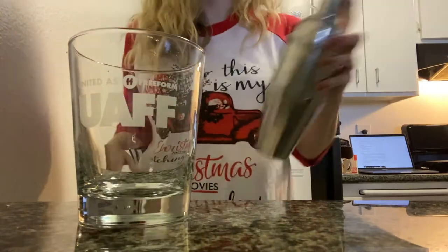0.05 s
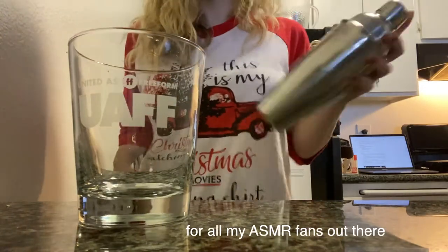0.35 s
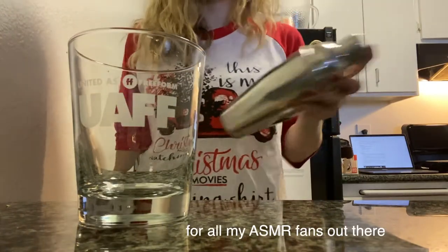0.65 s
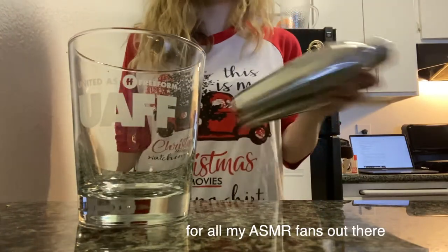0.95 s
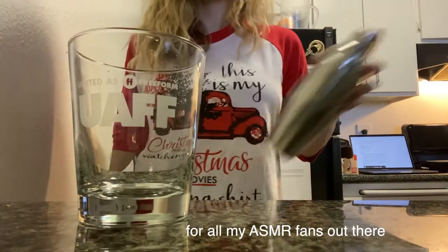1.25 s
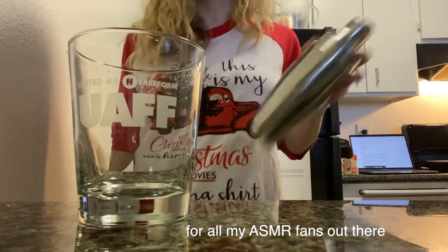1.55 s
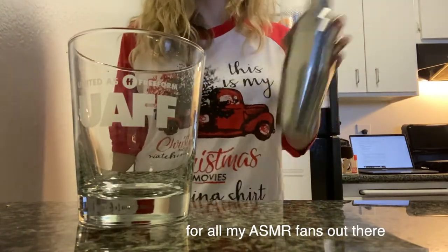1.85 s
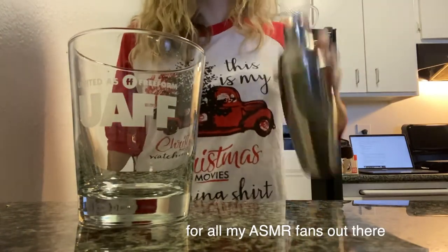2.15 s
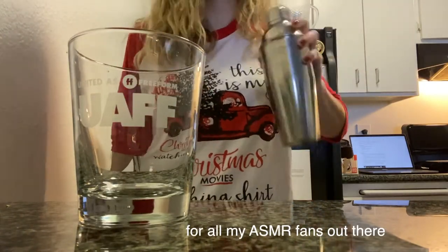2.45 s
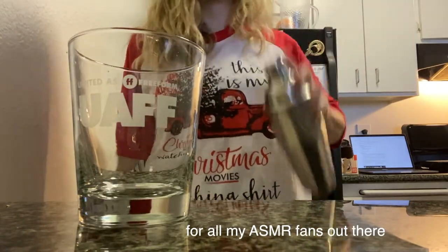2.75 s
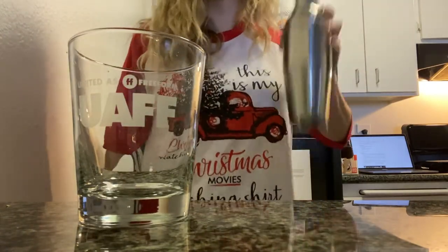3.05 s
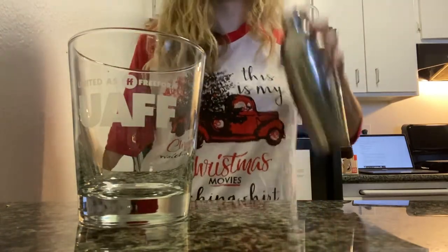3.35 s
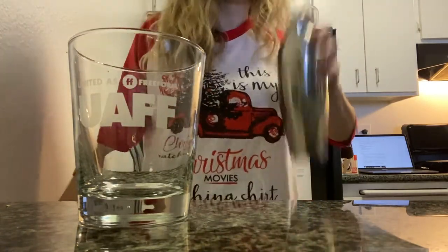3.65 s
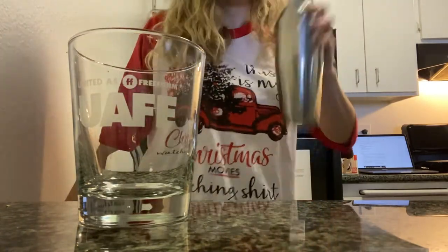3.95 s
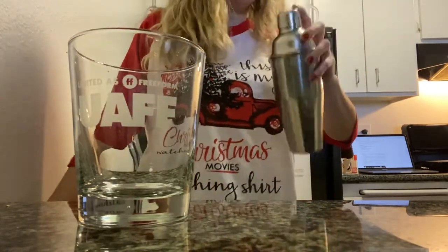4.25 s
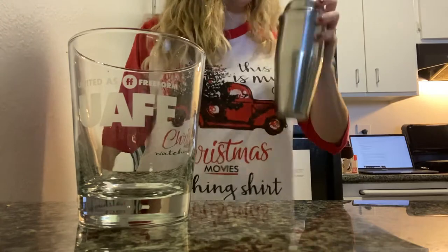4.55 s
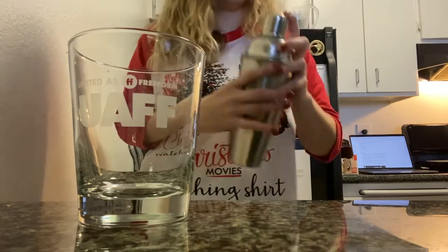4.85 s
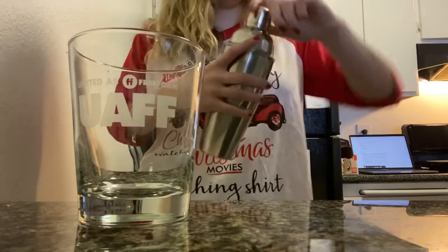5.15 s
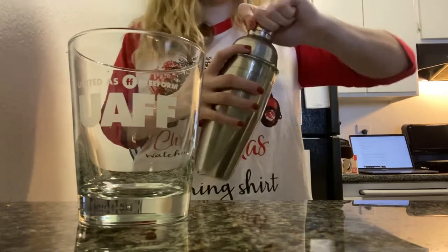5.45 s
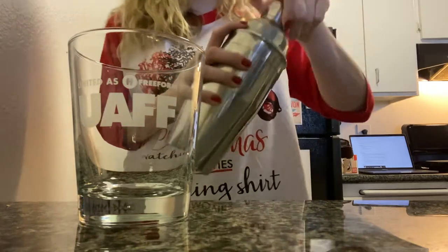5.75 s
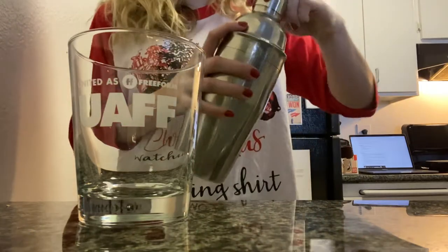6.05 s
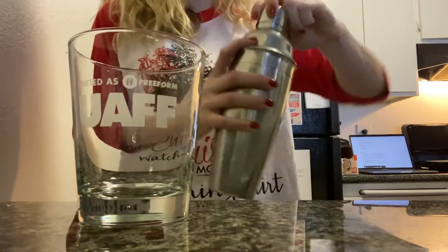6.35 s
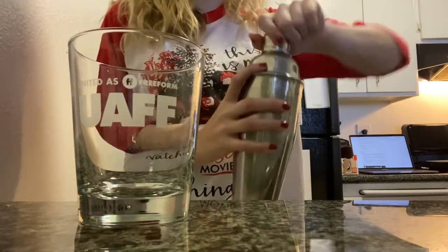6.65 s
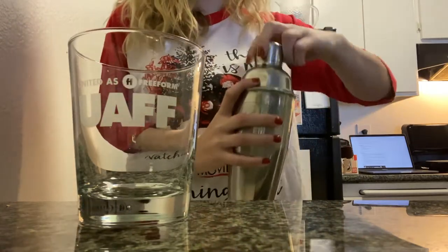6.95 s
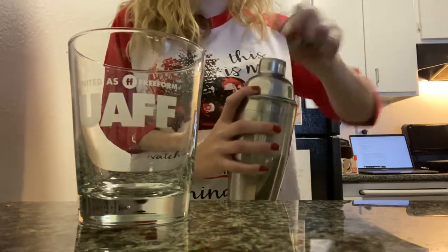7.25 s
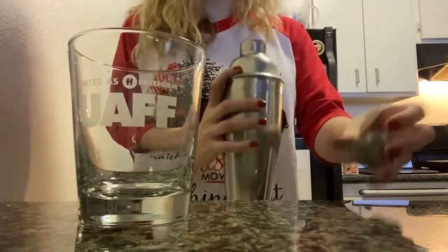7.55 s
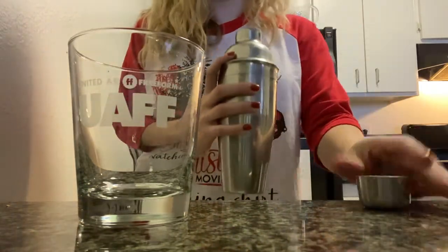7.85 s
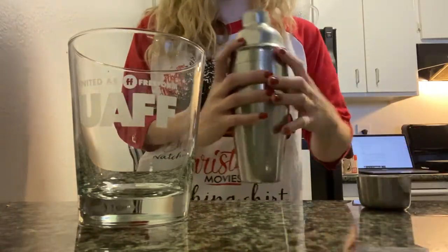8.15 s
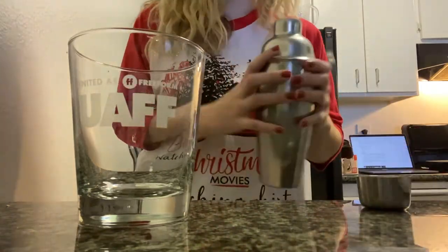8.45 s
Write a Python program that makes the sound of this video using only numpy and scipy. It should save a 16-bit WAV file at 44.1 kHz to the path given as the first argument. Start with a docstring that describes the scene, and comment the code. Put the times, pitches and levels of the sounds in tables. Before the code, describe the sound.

A metal cocktail shaker is shaken with clattering ice and sloshing drink, followed by quiet twisting and one sharp, ringing clink.

```python
"""Shaking a cocktail

Ice and drink are shaken hard in a steel shaker: cubes strike, chips tumble and the liquid gurgles.
Then fingers tap the shaker and twist its tight cap, a small steel cup chimes on the stone counter,
and a hand grips the shaker again. An appliance hums, the kitchen echoes, and a limiter (an automatic
volume control) briefly turns the sound down after the cup lands."""
import sys
import numpy as np
from scipy import signal
from scipy.fft import rfft, irfft, next_fast_len
from scipy.io import wavfile
from scipy.ndimage import uniform_filter1d, map_coordinates

SR = 44100
rng = np.random.default_rng(int(sys.argv[2]) if len(sys.argv) > 2 else 0)


def store_pcm(level_fs):
    """Save levels as 16-bit WAV."""
    pcm = np.round(np.clip(level_fs, -1, 1) * 32767).astype(np.int16)
    wavfile.write(sys.argv[1], SR, np.atleast_2d(pcm).T)


N = 378819

# the tone of moving liquid: pitch_hz, level_db
LIQUID_TONE = [(300, -16), (650, -0.5), (900, -10.5), (1250, 3.5), (1650, -7), (2800, -4.5), (6500, -20),
               (16000, -28)]
# the drink lands at one end of the shaker and traps a pocket of air: start_s, level_db
SPLASH_TIMES = [(.255, -33.5), (.99, -34.5), (1.38, -26.5), (1.635, -33.5), (1.73, -29), (1.99, -30),
                (2.134, -24), (2.332, -33.5), (3.478, -31.5), (3.677, -25), (3.869, -27), (4.189, -30),
                (4.711, -31.5)]
# the tone of rubbing on steel: pitch_hz, level_db
RUB_TONE = [(250, -0.5), (1600, 0.5), (4000, -11), (16000, -6)]


def amp(db):
    """Turn decibels into a gain. amp(-60 * t / fade_s) dies away by 60 dB in fade_s seconds."""
    return 10 ** (np.asarray(db) / 20)


def unit(x):
    """Scale a sound to an average strength (rms) of 1."""
    return x / np.sqrt(np.mean(x ** 2) + 1e-20)


def burst(x):
    """Scale a short sound to the energy of 4 ms at strength 1."""
    return x * np.sqrt(.004 * SR / (np.sum(x ** 2) + 1e-20))


def along(points, hz):
    """Read between the rows of a (pitch_hz, value) table, with octaves evenly spaced."""
    pitches, values = np.transpose(points)
    return np.interp(np.log(hz + 1), np.log(pitches + 1), values)


def wobble(rate):
    """A smooth curve through `rate` random values a second."""
    return map_coordinates(rng.standard_normal(int(N * rate / SR) + 4), [np.arange(N) * rate / SR])


def filtered(x, response):
    """Change the strength and timing of each frequency in a sound by response(hz)."""
    n = x.shape[-1]
    padded = next_fast_len(n + min(n, 8192))
    return irfft(rfft(x, padded) * response(np.fft.rfftfreq(padded, 1 / SR)), padded)[..., :n]


def coloured(x, tone):
    """Shape a sound with a (pitch_hz, level_db) table and scale it to strength 1."""
    return unit(filtered(x, lambda hz: amp(along(tone, hz))))


def resonate(x, resonances, shift=1):
    """Make a sound ring at a body's own pitches, each multiplied by shift."""
    def response(hz):
        return sum((-1) ** k * amp(db) * 1j * hz * width
                   / ((pitch * shift) ** 2 - hz * hz + 1j * hz * width)
                   for k, (pitch, width, db) in enumerate(resonances))
    return filtered(x, response)


def grainy(tone, grain_db, rate, apart):
    """Stereo noise in uneven grains; a larger `apart` makes left and right less alike."""
    noise = rng.standard_normal((3, N))
    return coloured((noise[0] + apart * noise[1:]) * amp(grain_db * wobble(rate)), tone)


def add(track, start_s, sound):
    """Mix a sound into a track at start_s."""
    part = track[..., max(round(start_s * SR), 0):][..., :sound.shape[-1]]
    part += sound[..., :part.shape[-1]]


def placed(x, lag_ms, left_db):
    """Make a sound stereo: the left microphone hears it lag_ms later and left_db louder."""
    side = np.array([[1], [-1]])
    return filtered(x, lambda hz: amp(side * left_db / 2) * np.exp(-1j * np.pi * side * hz * lag_ms / 1000))


def background(hum_db=-50, drone_db=-60, rumble_db=-52):
    """An appliance hums on two low notes over the steady rumble of the room."""
    # the tone of the room's rumble: pitch_hz, level_db
    rumble_tone = [(25, -33.5), (60, -6.5), (145, -1.5), (210, -29.5), (400, -22), (800, -39), (4000, -57)]
    t = np.arange(N) / SR
    hum = amp(hum_db + wobble(6)) * np.sin(2 * np.pi * 59.3 * t + .5 * wobble(7))
    drone = amp(drone_db + 2 * wobble(8)) * np.sin(2 * np.pi * 130 * t + wobble(20))
    rumble = amp(rumble_db) * grainy(rumble_tone, grain_db=1.5, rate=9, apart=.35)
    return (np.sqrt(2) * (hum + drone) + rumble) * amp([[.9], [-.9]])


def slosh(burble_db=-9, burble_hz=950):
    """Liquid and foam wash along the walls, burbling as air pockets open, glide in pitch and close."""
    # how the wash of thrown liquid rises and falls: time_s, relative_level_db
    wash_levels = [(0, -36), (.8, -41.5), (2.3, -36.5), (4.1, -40.5), (4.72, -45), (4.9, -62)]
    loudness = amp(np.interp(np.arange(N) / SR, *np.transpose(wash_levels), left=-120, right=-120))
    wash = grainy(LIQUID_TONE, grain_db=3.5, rate=90, apart=.9)
    hz = burble_hz * np.exp(.3 * wobble(45))
    burble = unit(amp(7 * wobble(110)) * np.sin(2 * np.pi * np.cumsum(hz) / SR))
    return amp(-2.5) * loudness * (wash + amp(burble_db) * burble)


def strike(hz, db, wall_db=3, crack_db=-4, pocket_db=-18, crack_fade_s=.003, crush_fade_s=.0083):
    """One blow: a short ping, the crack of ice, and the ring of the steel wall and the air inside."""
    # the ringing pitches of the filled shaker: pitch_hz, width_hz, level_db
    wall_resonances = [(1103, 160, -2), (1349, 104, 1.5), (1813, 52, -1.5), (2141, 200, -3.5),
                       (2788, 330, -3), (3723, 1240, -7.5), (9150, 13000, -16.5)]
    # the ringing pitches of the air pocket above the drink: pitch_hz, width_hz, level_db
    pocket_resonances = [(370, 7.5, -10), (665, 15, -1)]
    t = np.arange(SR // 16) / SR
    noise = rng.standard_normal((3, len(t)))
    ping = burst(np.sin(2 * np.pi * hz * t) * np.exp(-t * hz) * (1 - np.exp(-t * hz * 2)))
    # hard, bright blows crack most; dull, heavy ones stir the air pocket
    brightness = hz / 2500
    snap = np.diff(noise[0], prepend=0) * amp(-60 * t / crack_fade_s)
    crack = burst(snap) * brightness * amp(.2 * (db + 22))
    crush = noise[1:] * amp(-60 * t / crush_fade_s)
    # the moving liquid weighs on the walls differently at every blow, shifting their pitches
    shift = np.exp(rng.normal(0, .058, 2))
    wall = resonate(crush[0], wall_resonances, shift[0])
    # pitches near that of the blow ring most
    wall = burst(filtered(wall, lambda f: 1 / (1 + .64j * (f / hz - hz / (f + 1)))))
    pocket = burst(resonate(crush[1], pocket_resonances, shift[1])) / brightness
    return amp(db) * burst(ping + amp(crack_db) * crack + amp(wall_db) * wall + amp(pocket_db) * pocket)


def knocks(rows, lag_ms):
    """Play (start_s, level_db, pitch_hz) blows, each from a slightly different place."""
    out = np.zeros((2, N))
    for start_s, db, hz in rows:
        blow = strike(hz, db)
        add(out, start_s, placed(blow, lag_ms + rng.normal(0, .064), left_db=rng.normal(1.57, 1)))
    return out


def ice(cube_hz=2550, wet_drop=.26, wet_s=.029, crunch_db=-9, crunch_delay_s=.0016):
    """Cubes strike the shaker and crunch against a second edge; chips tumble after them."""
    # a cube hits the wall or another cube: start_s, level_db
    cube_hits = [(0.03, -20), (.052, -25), (0.083, -22.5), (0.2272, -18.5), (0.2609, -20), (.367, -25),
                 (.392, -22), (.4038, -21.5), (.489, -24.5), (0.5409, -16), (0.5469, -19), (0.6033, -21),
                 (0.646, -31.5), (.6853, -23.5), (.6982, -18), (.831, -14), (.849, -23.5), (.8789, -24.5),
                 (.9953, -18.5), (1.0614, -22), (1.0821, -21), (1.2116, -22), (1.3378, -9.5), (1.391, -20),
                 (1.4405, -22.5), (1.4746, -12.5), (1.497, -21), (1.556, -26.5), (1.5726, -16),
                 (1.6582, -23), (1.6938, -29), (1.719, -16), (1.7408, -25.5), (1.7722, -22.5),
                 (1.8114, -17.5), (1.8701, -21), (2.0236, -24.5), (2.0355, -22), (2.0514, -23),
                 (2.1158, -22), (2.1403, -18), (2.182, -24.5), (2.1961, -24.5), (2.2496, -17.5),
                 (2.3113, -18), (2.3364, -14.5), (2.343, -18.5), (2.3932, -27), (2.4391, -16.5),
                 (2.5128, -20), (2.5277, -15.5), (2.5821, -25), (2.5916, -21.5), (2.6004, -24),
                 (2.6382, -20), (2.7613, -22), (2.814, -26), (2.9318, -26.5), (2.9797, -25.5),
                 (3.0966, -22.5), (3.1092, -24.5), (3.1227, -20.5), (3.129, -21), (3.1726, -26.5),
                 (3.245, -23), (3.2538, -24), (3.3049, -20.5), (3.3296, -16), (3.3467, -21.5), (3.369, -16),
                 (3.387, -23.5), (3.395, -23.5), (3.464, -21.5), (3.4835, -17.5), (3.5403, -22.5),
                 (3.6761, -22), (3.6979, -19), (3.707, -25), (3.7597, -24.5), (3.8708, -12.5),
                 (3.8803, -25), (3.9264, -26), (4.0025, -26.5), (4.1056, -32), (4.1897, -15),
                 (4.2986, -26.5), (4.3262, -22), (4.334, -16), (4.3483, -15), (4.4104, -19.5),
                 (4.4515, -16.5), (4.4646, -20), (4.6325, -28.5), (4.6693, -19), (4.7132, -23)]
    start_s, db = np.transpose(cube_hits)
    wait, tone = rng.standard_normal((len(start_s), 2)).T
    # a cube that lands close in time to a splash is cushioned, so its pitch is lower
    wetness = np.max([np.exp(-((start_s - splash_s) / wet_s) ** 2) for splash_s, _ in SPLASH_TIMES], 0)
    hz = cube_hz * np.exp(.19 * tone) * (1 - wet_drop * wetness)
    crunches = zip(start_s + crunch_delay_s * np.exp(.5 * wait), db + crunch_db, hz)
    return knocks([*zip(start_s, db, hz), *crunches, *tumble(start_s)], lag_ms=-.011)


def after_ring(blows, ring_db=-18, waver=.32):
    """The steel wall rings on faintly after each blow; the moving drink makes it waver."""
    # the lingering notes of the wall: pitch_hz, level_db, fade_s
    wall_notes = [(1330, -12.5, 0.83), (1800, -5.5, 0.5), (2290, 2, 0.25), (2870, -7, .85),
                  (5270, -12, 0.76), (9650, -12, .5)]
    t = np.arange(SR) / SR
    ring = sum(amp(db - 60 * t / fade_s) * np.sin(2 * np.pi * hz * t + waver * wobble(70)[:SR])
               for hz, db, fade_s in wall_notes)
    return amp(ring_db) * blows.std() * unit(signal.fftconvolve(blows, ring[None], axes=1)[:, :N])


def tumble(cube_times, chip_db=-33, chip_hz=3300, delay_s=.04):
    """Two chips of random size tick after each cube. Gives rows of start_s, level_db, pitch_hz."""
    cube_s = np.repeat(cube_times, 2)
    wait, size, tone = rng.standard_normal((len(cube_s), 3)).T
    start_s = cube_s + delay_s * np.exp(.7 * wait)
    return zip(start_s, chip_db + 1.5 * size, chip_hz * np.exp(.36 * tone))


def grips(rustle_db=-16):
    """A soft palm thuds on the shaker and rustles along it."""
    # a hand closes and slides: start_s, length_s, level_db
    hand_moves = [(0.158, 0.11, -39.5), (5.322, 0.045, -49), (5.35, 2.1, -61.5), (8.181, 0.53, -51)]
    pressure = np.zeros(N)
    for start_s, length_s, db in hand_moves:
        add(pressure, start_s, amp(db) * np.sqrt(np.linspace(1, 0, int(length_s * SR))))
    rustle = grainy(RUB_TONE, grain_db=6, rate=110, apart=.98)
    thud = unit(resonate(rustle, [(193, 125, -.09), (346.5, 64, -.91)]))  # pitch_hz, width_hz, level_db
    return pressure * (thud + amp(rustle_db) * rustle)


def splashes(glug_hz=760, sink_hz_per_s=38, glug_db=1, bubble_db=-4, wash_db=-6, rise_s=.0095):
    """Each splash swells and drains while its air pocket and a smaller bubble ring unsteadily."""
    swell, glugs = np.zeros(N), np.zeros((2, N))
    t = np.arange(SR // 8) / SR
    for start_s, db in SPLASH_TIMES:
        hz = glug_hz - sink_hz_per_s * start_s  # the pitch sinks as the drink froths up
        surge = amp(db) * t / rise_s * np.exp(1 - t / rise_s)
        pocket = np.sin(2 * np.pi * hz * t + wobble(200)[:len(t)])
        bubble = amp(bubble_db) * np.sin(2 * np.pi * 1.7 * hz * t + wobble(200)[:len(t)])
        add(swell, start_s, surge)
        add(glugs, start_s, placed(surge * (pocket + bubble), lag_ms=rng.normal(0, .37), left_db=-1))
    wash = swell * grainy(LIQUID_TONE, grain_db=4.5, rate=270, apart=.31)
    return amp(glug_db) * glugs + amp(wash_db) * wash


def taps():
    """The ice settles, and fingers knock lightly on the shaker as they handle it."""
    # small knocks: start_s, relative_level_db, pitch_hz
    small_knocks = [(4.792, -23, 1436), (4.916, -35, 2900), (5.025, -36, 1494), (5.108, -42, 1350),
                    (5.379, -27, 2815), (5.562, -33.5, 3540), (5.754, -39, 1246), (6.252, -43.5, 3050),
                    (6.652, -39.5, 4150), (6.684, -27, 1370), (6.791, -45.5, 2820), (8.172, -41.5, 3540),
                    (8.359, -41, 3500)]
    return amp(-8) * knocks(small_knocks, lag_ms=-.059)


def scrapes(grit_db=-3, cap_db=-5, edge_db=-1, squeal_db=-10, squeal_hz=2100):
    """The tight cap sticks and slips on the steel, ringing a little under unsteady fingers."""
    # short twists of the cap: start_s, length_s, level_db
    twists = [(5.32, 0.029, -44.5), (5.382, .25, -52), (5.521, .025, -49), (5.68, .018, -48),
              (5.885, 0.098, -49.5), (5.926, .02, -49), (6.021, .02, -49.5), (6.33, 0.047, -47.5),
              (6.427, 0.24, -56), (6.521, 0.038, -52), (6.861, 0.024, -46.5), (6.889, 0.082, -51),
              (6.991, .06, -45.5), (7.029, .016, -41), (7.05, 0.017, -34.5)]
    # the ringing pitches of the small steel cap: pitch_hz, width_hz, level_db
    cap_resonances = [(2280, 700, 8), (9910, 370, -14)]
    # the ringing pitch of the cap's edge: pitch_hz, width_hz, level_db
    edge_resonance = [(3463, 360, 0)]
    strokes = np.zeros(N)
    for start_s, length_s, db in twists:
        add(strokes, start_s, amp(db) * np.sqrt(np.hanning(int(length_s * SR))))
    grit = grainy(RUB_TONE, grain_db=3, rate=900, apart=.6)
    cap = amp(cap_db) * unit(resonate(grit, cap_resonances))
    # the point of contact wanders, and its rasping pitch with it
    hz = squeal_hz * np.exp(.25 * wobble(160))
    squeal = amp(squeal_db) * unit(amp(6 * wobble(300)) * np.sin(2 * np.pi * np.cumsum(hz) / SR))
    # the harder the stroke, the more the edge rings
    edge = amp(edge_db) * strokes / strokes.max() * unit(resonate(grit, edge_resonance))
    pressure = amp(1.2 * wobble(70))
    return strokes * pressure * (amp(grit_db) * grit + cap + edge + squeal)


def cup(clack_db=7, free_ring_db=-29, contact_fade_s=.044, clack_fade_s=.046):
    """A steel cup lands on stone: a clack, a chime cut short by the contact, and a faint free ring."""
    # the rim touches, lands and rocks: start_s, level_db, hardness (0 to 1)
    landings = [(7.595, -17, 0.03), (7.604, -9.5, 0.02), (7.6089, -5.5, 0.21), (7.6127, -12, 0.48)]
    # the notes of the cup: pitch_hz, level_db, free_fade_s
    cup_notes = [(2570, -15, .3), (2710, -16, .3), (5160, -12, .35), (5295, -9, .45), (5400, 0, .4),
                 (9720, -8, .42)]
    # the tone of steel hitting stone: pitch_hz, level_db
    clack_tone = [(200, -18), (650, -12), (850, -21), (1700, -16), (2600, 1), (3700, -10), (5300, -3),
                  (8300, -32), (9300, -14), (11500, -44), (15600, -19)]
    clacks, swell = np.zeros(N), np.zeros((len(cup_notes), N))
    t = np.arange(SR * 3 // 4) / SR
    hz, note_db, free_fade_s = np.transpose(cup_notes)[..., None]
    fade = amp(note_db) * (amp(-60 * t / contact_fade_s) + amp(free_ring_db - 60 * t / free_fade_s))
    for start_s, db, hardness in landings:
        # a soft touch builds the chime slowly and wakes little but its strongest note
        rise = 1 - np.exp(-t * hardness / .00015)
        add(swell, start_s, amp(db + note_db * (1 - hardness)) * fade * rise)
        clack = coloured(rng.standard_normal(len(t)), clack_tone)
        add(clacks, start_s, hardness * clack * amp(db + clack_db - 60 * t / clack_fade_s))
    waver = .9 * wobble(150)  # the chime wavers and sounds rough as it rings in the room
    chime = np.sum(swell * np.sin(2 * np.pi * hz * np.arange(N) / SR + waver), axis=0)
    return placed(chime + clacks, lag_ms=-.0093, left_db=-3.5)


def kitchen(x, near_db=2, near_fade_s=.07):
    """The counter and cupboards give a short echo, and the room a longer one."""
    # how long the room's echo lasts: pitch_hz, fade_s
    room_fades = [(200, 0.34), (1100, 0.45), (10000, 0.33)]
    out = np.zeros((2, N))
    step = SR // 4  # a new echo every quarter second, as the source moves
    for start in range(0, N, step):
        hz, t, noise = signal.stft(rng.standard_normal((2, SR // 2)), SR, nperseg=128)
        near = amp(near_db - 60 * t / near_fade_s)
        far = amp(-60 * t / along(room_fades, hz)[:, None])
        echo = signal.istft(noise * (near + far), SR, nperseg=128)[1]
        echo /= np.linalg.norm(echo[0])
        add(out, start / SR, signal.fftconvolve(x[None, start:start + step], echo, axes=1))
    return out


def scene():
    """The shaker, the hand and the cup, with the kitchen around them."""
    chime = cup()
    cubes = ice()
    shaker = cubes + splashes() + taps() + scrapes()
    room = kitchen(amp(-5.5) * shaker[0] + amp(-5) * chime[0])
    return shaker + after_ring(cubes) + chime + room + slosh() + grips() + background()


def microphone_pair(x):
    """Both sides take most of their top treble from one opening, and the left gets it later."""
    # how far the left side's wave is ahead (negative means behind): pitch_hz, lead_radians
    left_lead = [(2800, 0), (5000, -1.2), (8300, -4.7), (16000, -12.6)]
    left, right = x
    shared = filtered(left - right, lambda hz: along([(5500, 0), (8500, .8)], hz))
    half_turn = np.array([[.5j], [-.5j]])  # each side takes half of the shift
    return filtered(np.array([left, right + shared]), lambda hz: np.exp(half_turn * along(left_lead, hz)))


def limiter(x, threshold_db=-15, attack_s=.0084, release_db_per_s=35):
    """The volume drops just after a loud sound begins, then creeps back."""
    power = np.abs(uniform_filter1d(np.mean(x ** 2, axis=0), SR // 200))
    over_db = np.maximum(10 * np.log10(power + 1e-12) - threshold_db, 0)
    recovery_db = release_db_per_s * np.arange(N) / SR
    gain_db = recovery_db - np.maximum.accumulate(over_db + recovery_db)
    smoothing = np.exp(-1 / (attack_s * SR))
    return x * amp(signal.lfilter([1 - smoothing], [1, -smoothing], gain_db))


def record(dry, top_hz=16300):
    """The microphones colour the sound, loud peaks are limited and the highest treble is cut off."""
    microphone_tone = [(4000, 0.0), (6500, 3.5), (10000, 0), (16300, -14.0)]  # pitch_hz, level_db
    heard = filtered(microphone_pair(dry), lambda hz: amp(along(microphone_tone, hz)))
    limited = np.clip(limiter(heard), -1, 1)
    return filtered(limited, lambda hz: np.clip((top_hz - hz) / 500 + .5, 0, 1))


dry = scene()
out = record(dry)
store_pcm(out)
```